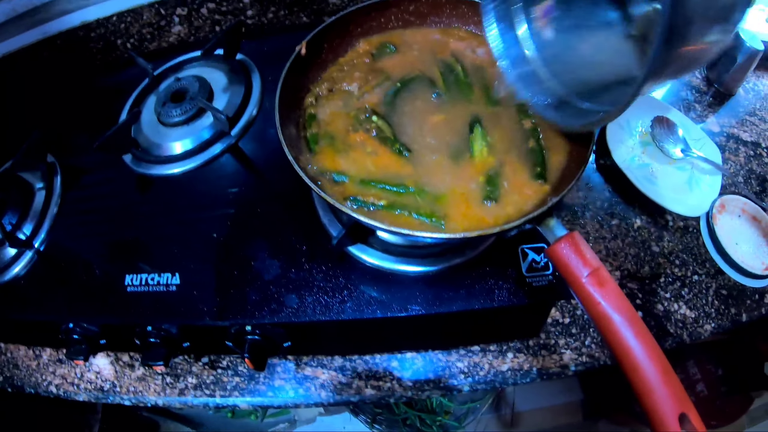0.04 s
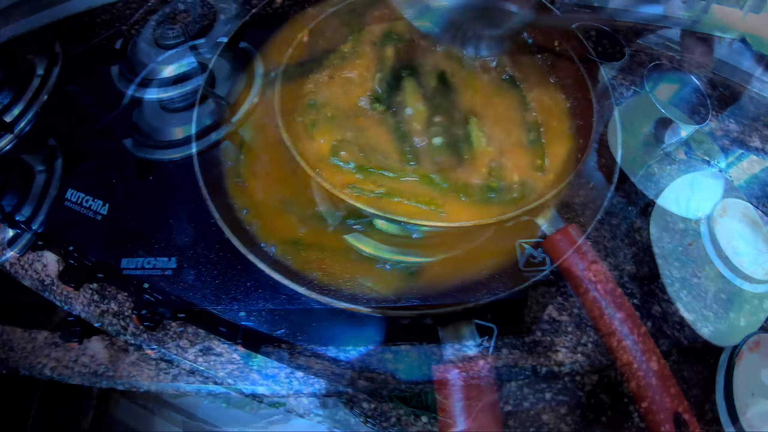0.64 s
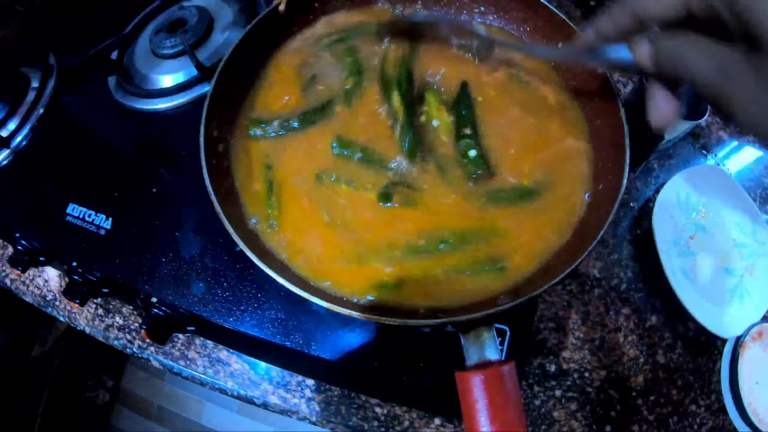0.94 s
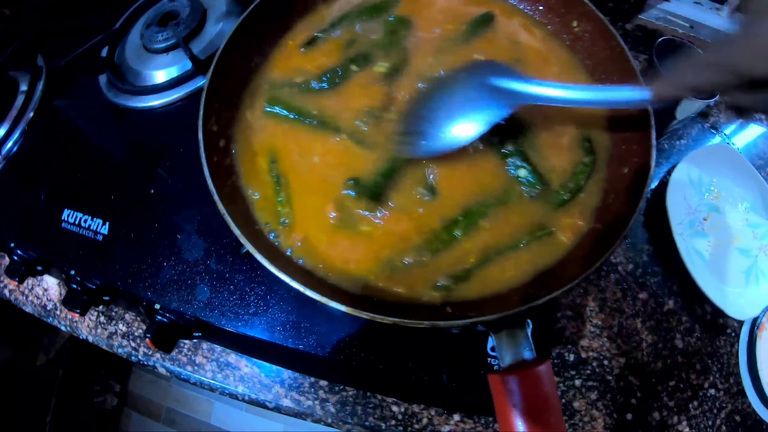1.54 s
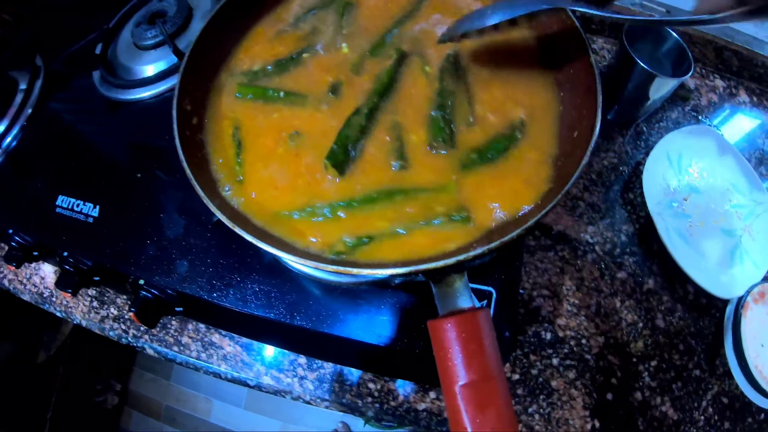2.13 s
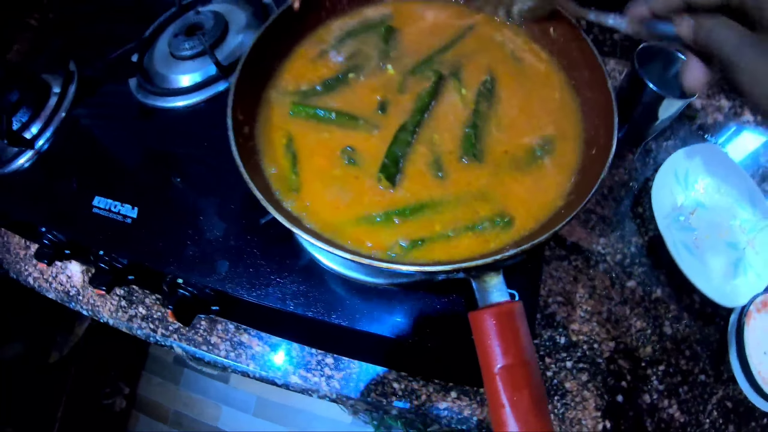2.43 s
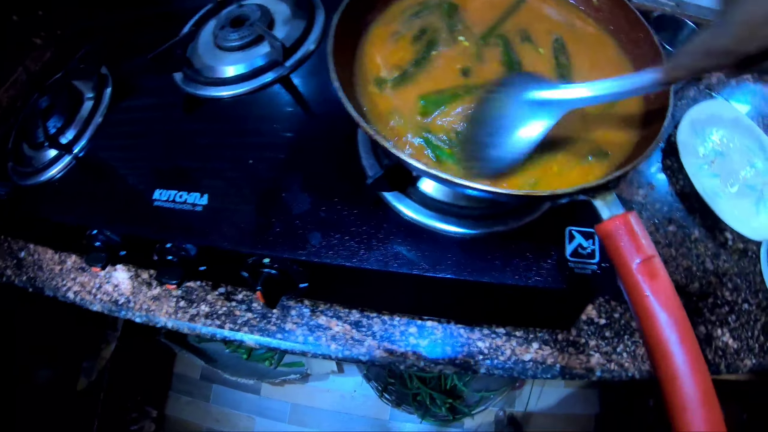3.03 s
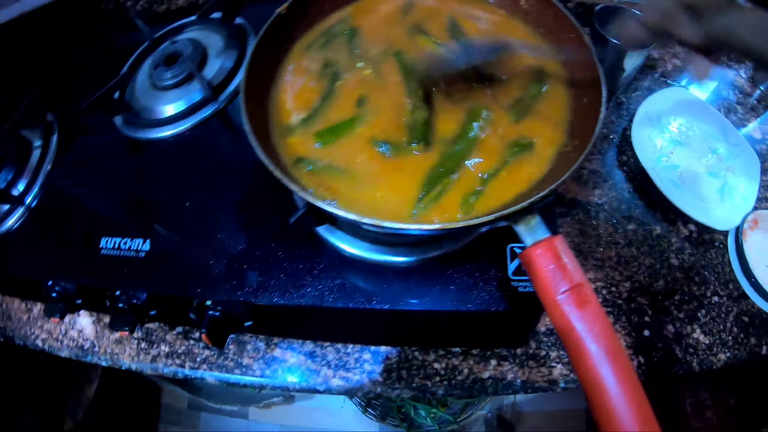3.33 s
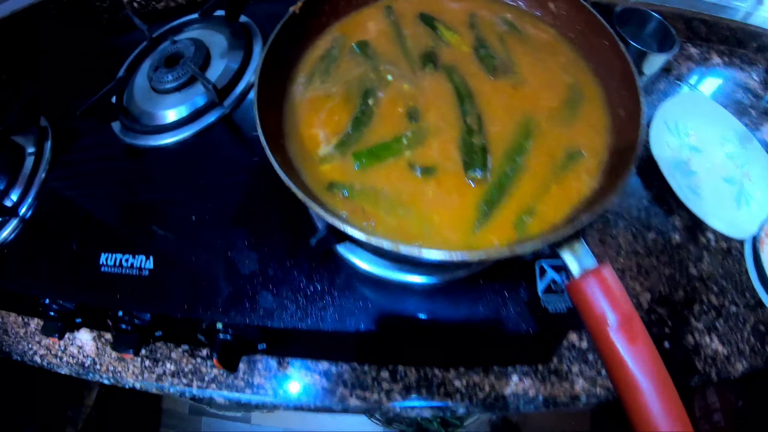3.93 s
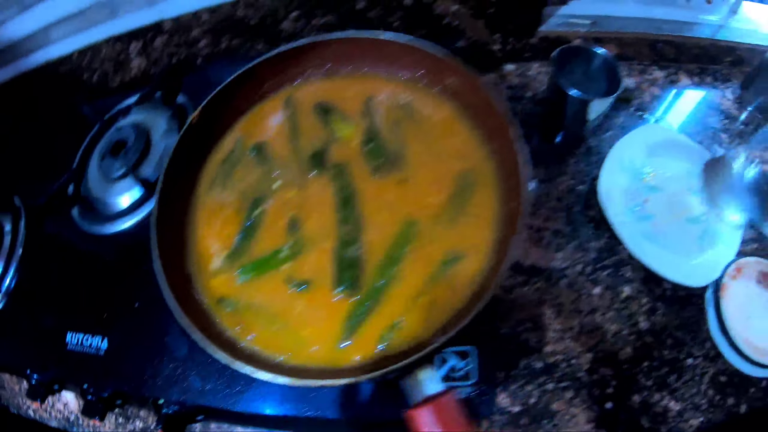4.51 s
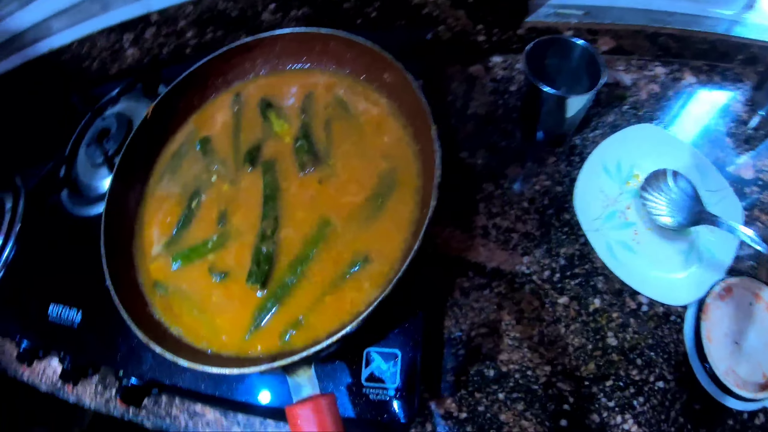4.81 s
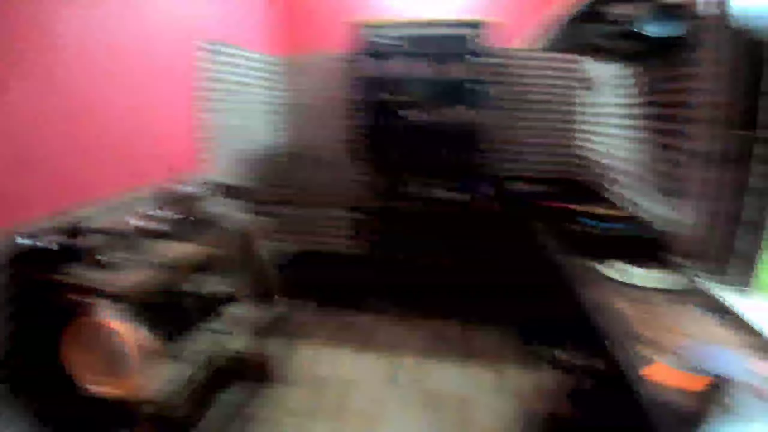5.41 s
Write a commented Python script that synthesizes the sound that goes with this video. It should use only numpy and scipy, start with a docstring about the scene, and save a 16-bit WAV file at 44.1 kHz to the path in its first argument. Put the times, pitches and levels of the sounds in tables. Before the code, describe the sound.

An extractor hood roars and drops to a soft fan rush, with a shuffle, a rustle and utensil clacks in a kitchen.

```python
"""An extractor hood roars close by in a tiled kitchen: air churns through its duct and the motor hums.
A few tiny squeaks sound within the roar, which fades in the first second and leaves a softer fan rush.
Someone moves about: a tick, a dull sliding shuffle, a tap, a rustle with a light rattle, and two
utensil clacks that echo off the tiles. Each struck thing cracks and rings briefly. A faint drone and
deep bumps come and go midway, and at the end everything fades out."""
import sys
import numpy as np
from scipy import signal
from scipy.fft import rfft, irfft
from scipy.io import wavfile
from scipy.ndimage import uniform_filter1d

SR = 44100
rng = np.random.default_rng(int(sys.argv[2]) if len(sys.argv) > 2 else 0)


def file_out(sig):
    """Save sig as 16-bit WAV at sys.argv[1]."""
    # one column per channel
    cols = np.atleast_2d(sig).T
    # limit, then scale
    lim = np.clip(cols, -1, 1)
    pcm = np.round(lim * 32767).astype(np.int16)
    wavfile.write(sys.argv[1], SR, pcm)


N = 249606
TIME, FREQ = np.arange(N) / SR, np.fft.rfftfreq(N, 1 / SR) + 1e-3

# The tone of the soft rush. Each row: frequency in Hz, level in dB.
RUSH_TONE = [(15, -58), (25, -27), (69, -26), (96, -15.5), (129, -11), (240, 1), (297, -1.5), (322, -9.5),
             (359, -4.5), (537, -4.5), (826, -14.5), (970, -13), (1140, -18.5), (2300, -16), (15500, -42.5)]
# Duct and room resonances in the rush. Each row: centre in Hz, width in Hz, boost or cut in dB.
RUSH_RESONANCES = [(105, 5.2, 8), (164, 28, 4.5), (250, 14, 3), (273, 13.4, -5.5), (283, 21, 3.5),
                   (343, 44, -3), (371, 18, 6), (412, 9.1, 3), (432, 16, -5), (466, 42, 4), (522, 46, 5),
                   (654.4, 39, -6.5), (691, 18, 7), (865, 99, -1.5), (875, 11, 1.5), (939, 15, 9.5),
                   (994, 43, 3.5), (1052, 13, 13.5), (1200, 120, -0.5), (1339, 24, 7.5), (1523, 88, 7.5),
                   (1726, 150, -2), (2010, 180, 2.5), (2310, 120, 0.5), (2960, 290, 2), (4520, 200, 0.5),
                   (5340, 260, 2.5), (6450, 100, 1.5), (10000, 1600, 2.5), (11100, 900, -1),
                   (12530, 920, 5.5)]
# How alike left and right are. Each row: frequency in Hz, likeness (1 means the same).
RUSH_LIKENESS = [(30, .94), (100, .992), (200, 1), (600, 0.97), (900, 0.58), (1700, 0.36), (3300, 0.57),
                 (6000, 0.59), (8000, 0.042), (12000, -0.13)]
# Swells of the low drone. Each row: start in seconds, level in dB, hold in seconds.
DRONE_SWELLS = [(2.133, -40.5, 0.093), (2.415, -39.5, 0.1), (2.754, -44, 0.079)]
# Soft deep bumps. Each row: middle in seconds, level in dB.
BUMPS = [(2.24, -52), (2.46, -53), (2.73, -53), (3.17, -59)]

# Brushing strokes. Each row: start in seconds, hiss in dB, ringing slips in dB, hold in seconds.
RUSTLE_STROKES = [(2.544, -49.5, -66, 0.17), (2.86, -45.5, -55, 0.073)]
# The tone of the brushing. Each row: frequency in Hz, level in dB.
RUSTLE_TONE = [(600, -18), (1600, 9.5), (4000, 0), (7500, -10), (10600, -7), (11600, -11), (15000, -11)]
# How alike its two sides are. Each row: frequency in Hz, likeness.
RUSTLE_LIKENESS = [(600, .8), (4000, 0.64), (9000, 0.25)]
# Short slides. Each row: start in seconds, level in dB, rise, hold and decay in seconds,
# treble tilt in dB per octave, thud pitch in Hz.
SHUFFLES = [(1.959, -28.5, 0.015, 0.038, 0.059, 0, 86), (2.062, -36, .01, .01, 0.044, -3.5, 85),
            (2.17, -34, 0.013, 0.049, 0.085, -5, 131)]
# The tone of the sliding. Each row: frequency in Hz, level in dB.
SHUFFLE_TONE = [(25, -21), (55, -30), (80, -1), (130, 3), (190, -6), (250, 0.5), (550, -8), (1200, -3.5),
                (2500, -10), (4500, -15.5), (7000, -29), (15000, -36)]
# Knocks as the sliding thing catches. Each row: time in seconds, level in dB, pitch in Hz.
CATCHES = [(2.004, -20, 450), (2.015, -26, 550), (2.028, -25, 700), (2.080, -28, 250)]

# Hits of the tick, tap and rattle. Each row: start in seconds, level in dB, pitch factor, ring in dB,
# damping factor, bass cut-off in Hz, bounce delay in seconds, bounce level in dB.
TICK_HITS = [(0.8888, -21.5, 1, -2, 1, 2400, 0.0038, -5)]
TAP_HITS = [(2.4638, -21.5, 1, -1.5, 1, 750, 0.0065, -11)]
RATTLE_HITS = [(2.8628, -33, 1, -6, 1, 2000, .005, -4), (2.907, -40, 1, 3, 1, 5000, .009, -2),
               (2.928, -41, 1.01, 1, 1, 4000, .012, -1), (2.956, -34.5, 1, -1, 1, 1200, 0.0064, -4)]
# Utensil hits. Each row: the same eight, then crack decay in seconds and knock, snap and treble in dB.
CLACK_HITS = [(4.8636, -18.5, 1, -4.5, 0.76, 1100, .0058, -10, .0028, 1.5, 0.5, 0.5),
              (5.2172, -24.5, 0.93, -1, 1.45, 500, .024, -9, 0.0033, -8, 1, 5)]
# The notes each object rings with. Each row: pitch in Hz, level in dB, seconds to fall by 60 dB.
# A hit's pitch and damping factors scale them.
TICK_MODES = [(3880, -2, .008), (4100, 3.5, .012), (7600, 2, 0.0088), (7970, 3.5, 0.00715),
              (12660, -12.5, .012)]
TAP_MODES = [(1520, -8, .018), (2200, -7, .016), (3630, -1.5, .012), (5900, -13, .01), (11100, -6, 0.01),
             (12450, -8, .012)]
RATTLE_MODES = [(1610, 0, .06), (2800, -2, .05), (4780, -5, 0.037), (6080, -6, 0.024), (7600, -12, .02),
                (8850, -7, .03), (10350, -5, 0.033), (10700, -8, .025), (12000, -9, .025),
                (13400, -13, .02), (14900, -12, .02)]
CLACK_MODES = [(1455, -4.5, 0.055), (1780, -3, 0.056), (1940, -3, .035), (2200, -11, .02), (3480, -4, 0.03),
               (3730, -10, .025), (4280, -6, .025), (4620, -2, .028), (4740, -1.5, 0.032), (4980, -6, .028),
               (5160, -4.5, 0.032), (6180, -6.5, 0.025), (8060, -15, .025), (10450, -14.5, 0.035)]
# The tone of each object's crack of contact. Each row: frequency in Hz, level in dB.
TICK_CRACK = [(3000, -7), (6000, -4.5), (15000, -6.5)]
TAP_CRACK = [(2400, -2), (4400, -7), (6500, -9), (7800, -13), (11000, -7), (15000, -12)]
RATTLE_CRACK = [(5500, 1), (9000, -9), (15000, -7)]
CLACK_CRACK = [(1500, -2.5), (2800, -8), (3900, -5), (4700, 1), (5600, -4), (9000, -10), (15000, -18)]
# Squeaky scrapes. Each row: middle in seconds, level in dB, pitch and width in Hz, half length in seconds.
SQUEAKS = [(.359, -34, 3900, 1500, .004), (0.501, -36, 3800, 1600, .008), (0.615, -27.5, 3460, 400, .005),
           (.70, -32, 4800, 1500, .003)]

# The tone of the air in the loud hood. Each row: frequency in Hz, level in dB.
HOOD_TONE = [(18, -56), (30, -26), (143, 0), (222, -4), (312, -1.5), (485, -11.5), (538, -14.5),
             (680, -6.5), (928, -18), (1060, -14), (1170, -14), (1370, -16.5), (3410, -22.5), (10200, -33),
             (11200, -37), (12000, -49), (15000, -62)]
# Canopy and duct resonances. Each row: centre in Hz, width in Hz, boost or cut in dB.
HOOD_RESONANCES = [(184, 55, 2.5), (225, 23, -9.5), (317, 150, 2.5), (377, 13, 5), (550, 160, -6),
                   (750, 110, -3.5), (840, 80, 0.5), (1045, 82, 3), (1190, 100, -6), (1450, 140, 3.5),
                   (1624, 67, -1), (1854, 160, 5), (2530, 400, 0), (3240, 650, 3), (10500, 1900, 3),
                   (15000, 900, -10)]
# How alike the hood's two sides are. Each row: frequency in Hz, likeness.
HOOD_LIKENESS = [(30, .94), (100, 1), (200, 0.99), (420, 0.96), (600, 0.19), (1300, 0.53), (3400, 0.84),
                 (6000, 0.29), (9000, -0.12), (13000, -0.53)]
# The hood's loudness over time. Each row: time in seconds, low roar in dB, hiss in dB.
HOOD_LEVELS = [(0, -23, -22), (.25, -22, -23), (.35, -26.5, -22.5), (.5, -23.5, -22.5), (.62, -22.5, -22),
               (.7, -23, -22)]
# The hum of motor and blades. Each row: pitch in Hz, level in dB.
MOTOR_TONES = [(140, -41.5), (164, -47), (274.5, -37), (349.9, -43.5), (624.5, -45), (701.5, -39.5),
               (1047, -46.5), (1394, -52), (1486, -50.5), (2024, -49), (2704, -50.5), (3402, -55)]


def undb(db):
    """Turn decibels into a number to multiply by."""
    return 10 ** (np.asarray(db) / 20)


def unit(x):
    """Scale a sound to an average (rms) level of 1."""
    return x / np.sqrt(np.mean(x ** 2))


def spectrum(rows):
    """Join (Hz, value) points into a curve over all frequencies."""
    hz, value = np.transpose(rows)
    return np.interp(np.log(FREQ), np.log(hz), value)


def resonances(rows):
    """Make a curve of bell-shaped peaks and dips, in dB."""
    return sum(db / (1 + (2 * (FREQ - hz) / width) ** 2) for hz, width, db in rows)


def colour(x, db):
    """Turn each frequency up or down by a curve in dB."""
    return irfft(rfft(x) * undb(db), N)


def wander(rate):
    """Drift smoothly at random, with about `rate` new values a second."""
    step = int(SR / rate)
    held = np.repeat(rng.standard_normal(N // step + 1), step)
    return unit(uniform_filter1d(uniform_filter1d(held, step), step)[:N])


def swell(start, rise, hold, decay):
    """Rise in a straight line, hold, then die away; all times are in seconds."""
    age = np.maximum(TIME - start, 0)
    return np.minimum(age / rise, 1) * np.exp(-np.maximum(age - rise - hold, 0) / decay)


def fade_out(end_s, length_s):
    """Fall in a straight line from full level to silence."""
    return np.clip((end_s - TIME) / length_s, 0, 1)


def pan(left_db):
    """Give two gains that make the left side louder than the right by left_db."""
    return undb(np.array([[left_db], [-left_db]]) / 2)


def stereo_noise(tone_db, likeness, left_db):
    """Make coloured noise; only the highs lean to one side, as long waves reach both sides alike."""
    mid, side = rfft(rng.standard_normal((2, N)))
    like = np.clip(spectrum(likeness), -.999, .999)
    both = mid * np.sqrt(1 + like) + np.array([[1], [-1]]) * side * np.sqrt(1 - like)
    lean = pan(left_db) ** (FREQ ** 4 / (FREQ ** 4 + 400 ** 4))
    return unit(irfft(both * undb(tone_db) * lean, N))


def walls(x, echoes):
    """Near walls send back copies (delay in seconds, level in dB) that put ripples in the treble."""
    copies = sum(undb(db) * np.exp(-2j * np.pi * FREQ * lag) for lag, db in echoes)
    return unit(irfft(rfft(x) * (1 + copies * FREQ / (FREQ + 900)), N))


def room(x, wet_db, t60, dull_hz):
    """Tiles return a short, duller echo that falls by 60 dB in t60 seconds."""
    t = TIME[:SR // 2]
    tail = rng.standard_normal((2, len(t))) * undb(-60 * t / t60) * np.clip(t / 0.0079, 0, 1)
    tail /= np.sqrt(np.sum(tail ** 2) / 2)
    wet = signal.fftconvolve(np.atleast_2d(x), tail, axes=1)[:, :N]
    return undb(wet_db) * colour(wet, -10 * np.log10(1 + (FREQ / dull_hz) ** 2))


def knock(t, hz):
    """One brief push makes a single wave, centred on t = 0 and strongest near hz."""
    u = (np.pi * hz * t) ** 2
    return (1 - 2 * u) * np.exp(-np.minimum(u, 100))


def strikes(hits, modes, crack_tone, crack_s, spread, knock_db=-60, knock_hz=2000):
    """Each hit knocks, cracks and rings, then bounces once; spread makes left and right differ."""
    rings, cracks, t = np.zeros((2, N)), np.zeros((2, N)), TIME[:SR // 4]
    for s, db, pitch, ring_db, damping, low_hz, bounce_s, bounce_db in hits:
        # small things give off little bass
        bass_cut = signal.butter(2, low_hz, "highpass", fs=SR, output="sos")
        for start, hit_db in ((s, db), (s + bounce_s, db + bounce_db)):
            phases = rng.uniform(0, 2 * np.pi, (len(modes), 1, 1))
            phases = phases + spread * rng.standard_normal((len(modes), 2, 1))
            ring = sum(undb(mode_db - 60 * damping * t / t60) * np.sin(2 * np.pi * hz * pitch * t + p)
                       for (hz, mode_db, t60), p in zip(modes, phases))
            body = .5 * undb(ring_db) * ring + undb(knock_db) * knock(t - 1 / knock_hz, knock_hz)
            noise = rng.standard_normal(len(t)) + spread * rng.standard_normal((2, len(t)))
            crack = noise * np.exp(-t / crack_s)
            i = int(start * SR)
            rings[:, i:i + len(t)] += undb(hit_db) * signal.sosfilt(bass_cut, body)[:, :N - i]
            cracks[:, i:i + len(t)] += undb(hit_db) * signal.sosfilt(bass_cut, crack)[:, :N - i]
    return rings + colour(cracks, spectrum(crack_tone))


def soft_rush(level_db=-35, settle_s=1.1, sag_start_s=4.6, sag_length_s=0.23):
    """A quiet draught rings duct and room; its hiss settles, and its middle weakens near the end."""
    rush = stereo_noise(spectrum(RUSH_TONE) + resonances(RUSH_RESONANCES), RUSH_LIKENESS, left_db=1.65)
    rush = walls(rush, [(.0043, -16.5), (.0091, -12.5), (.0153, -19.5)])
    hiss = colour(rush, spectrum([(2000, -43), (4500, 4)]))
    middle = colour(rush, spectrum([(230, -28), (340, -2.5), (580, 1), (850, -28)]))
    rumble = colour(rush, spectrum([(55, 2), (100, -40.5)]))
    hiss_db = -1.5 + 4.5 * np.exp(-TIME / settle_s) + 0.47 * wander(8.7)
    middle_db = -2.5 * np.clip((TIME - sag_start_s) / sag_length_s, 0, 1)
    for band, db in ((hiss, hiss_db), (middle, middle_db), (rumble, 1.6 * wander(5.8))):
        rush = rush + band * (undb(db) - 1)
    return rush * undb(level_db + 0.35 * wander(10))


def drone(hz=163.4):
    """A faint, wavering low note comes and goes."""
    note = np.sqrt(2) * np.sin(2 * np.pi * hz * np.cumsum(1 + 0.0151 * wander(10)) / SR)
    return note * sum(undb(db) * swell(s, 0.055, hold, 0.031) for s, db, hold in DRONE_SWELLS)


def bumps(half_length_s=.04):
    """Very deep noise swells into soft bumps at the bottom of hearing."""
    tone = spectrum([(15, -30), (28, 3), (42, 2), (65, -29), (200, -80)])
    deep = unit(colour(rng.standard_normal(N), tone))
    return deep * sum(undb(db) * np.exp(-((TIME - s) / half_length_s) ** 2) for s, db in BUMPS)


def rustle(slips_per_s=160, scatter_db=3):
    """Dry brushing hisses, and its little slips ring the same small object as the rattle."""
    brush = stereo_noise(spectrum(RUSTLE_TONE), RUSTLE_LIKENESS, left_db=1)
    brush = unit(brush * undb(2.7 * wander(500)))
    slips = rng.random(N) < slips_per_s / SR
    slips = slips * undb(scatter_db * np.clip(rng.standard_normal(N), -2, 2))
    t = TIME[:SR // 20]
    ring = sum(undb(db - 60 * t / t60) * np.sin(2 * np.pi * (hz * t + .5 * rng.random((2, 1))))
               for hz, db, t60 in RATTLE_MODES)
    jingle = unit(signal.fftconvolve(slips[None], ring, axes=1)[:, :N])
    return sum((undb(hiss_db) * brush + undb(slip_db) * jingle) * swell(s, 0.035, hold, 0.075)
               for s, hiss_db, slip_db, hold in RUSTLE_STROKES)


def shuffles(thud_lag_s=0.02):
    """Something heavy slides and catches in dull knocks; a low thud trails each gritty scrape."""
    out = sum(undb(db) * knock(TIME - s, hz) for s, db, hz in CATCHES)
    out = out + room(out, wet_db=-10, t60=.35, dull_hz=3000)
    for s, db, rise, hold, decay, tilt, thud_hz in SHUFFLES:
        tone = spectrum(SHUFFLE_TONE) + tilt * np.log2(1 + FREQ / 1000) + resonances([(thud_hz, 45, 7)])
        scrape = unit(stereo_noise(tone, RUSH_LIKENESS, left_db=-0.5) * undb(0.81 * wander(300)))
        thud = colour(scrape, spectrum([(300, -2.5), (700, -26)]))
        grit = (scrape - thud) * swell(s, rise, hold, decay)
        out = out + undb(db) * (grit + thud * swell(s + thud_lag_s, rise, hold, decay))
    return out


def tick():
    """A small hard contact rings high and very briefly."""
    return strikes(TICK_HITS, TICK_MODES, TICK_CRACK, crack_s=0.0016, spread=0.21)


def tap():
    """A soft contact gives a hollow knock and a short ring."""
    return strikes(TAP_HITS, TAP_MODES, TAP_CRACK, crack_s=0.0018, spread=0.21,
                   knock_db=-4.5, knock_hz=1700)


def rattle():
    """A small light object clicks four times in quick succession."""
    return strikes(RATTLE_HITS, RATTLE_MODES, RATTLE_CRACK, crack_s=0.0011, spread=0.5)


def utensil_clacks():
    """A utensil strikes twice: a hard knock, then a brighter snap."""
    out = 0
    for *hit, crack_s, knock_db, snap_db, treble_db in CLACK_HITS:
        clack = strikes([hit], CLACK_MODES, CLACK_CRACK, crack_s, spread=0.67,
                        knock_db=knock_db, knock_hz=1880)
        out = out + colour(clack, spectrum([(2500, 0), (4500, snap_db), (7000, 0), (13000, treble_db)]))
    return out


def squeaks():
    """Each tiny scrape is a narrow band of noise that swells and dies."""
    out = 0
    for s, db, hz, width, half_length in SQUEAKS:
        peak = -20 * np.log10(1 + (2 * (FREQ - hz) / width) ** 2)
        band = unit(colour(rng.standard_normal(N), peak))
        out = out + undb(db) * band * np.exp(-((TIME - s) / half_length) ** 2)
    return out


def motor_hum():
    """Motor and blades give tones that waver together in pitch and separately in loudness."""
    motor_time = np.cumsum(1 + 0.0021 * wander(6)) / SR
    hum = 0
    for hz, db in MOTOR_TONES:
        level = undb(db + 2.1 * wander(13)) * np.sqrt(2)
        hum = hum + level * np.sin(2 * np.pi * (hz * motor_time + rng.random()))
    return hum


def hood():
    """Air churns through canopy and duct, roaring and hissing over the motor's hum, then all fades."""
    air = stereo_noise(spectrum(HOOD_TONE) + resonances(HOOD_RESONANCES), HOOD_LIKENESS, left_db=2)
    air = walls(air, [(.0031, -15.5), (.0074, -22), (.0127, -17)])
    lows = colour(air, spectrum([(400, 2), (900, -29)]))
    times, roar_db, hiss_db = np.transpose(HOOD_LEVELS)
    roar = lows * undb(np.interp(TIME, times, roar_db))
    hiss = (air - lows) * undb(np.interp(TIME, times, hiss_db) + 0.83 * wander(60))
    return (roar + hiss + motor_hum()) * fade_out(end_s=0.87, length_s=0.2)


def scene():
    """Mix the fan with small sounds close by and, off to the right, clacks with more echo."""
    fan = hood() + soft_rush()
    close = tick() + tap() + rattle()
    clacks = utensil_clacks()
    close = close + room(close, wet_db=-8, t60=.3, dull_hz=11000)
    clacks = clacks * pan(-6) + room(clacks, wet_db=0.5, t60=0.48, dull_hz=15000)
    return fan + close + clacks + shuffles() + rustle() + drone() + bumps() + squeaks()


def record(dry, gain_db=1.28, top_hz=15600):
    """Turn the sound up a little, fade out the end and cut the highest treble."""
    faded = dry * undb(gain_db) * fade_out(end_s=5.49, length_s=.2)
    return signal.sosfilt(signal.ellip(10, .2, 80, top_hz, fs=SR, output="sos"), faded)


dry = scene()
out = record(dry)
file_out(out)
```